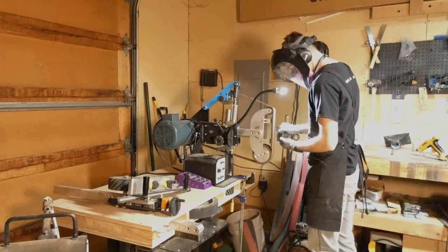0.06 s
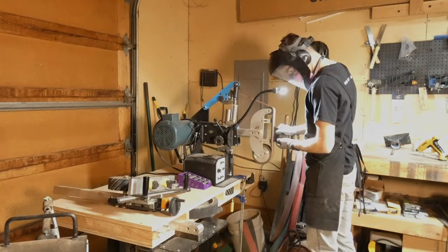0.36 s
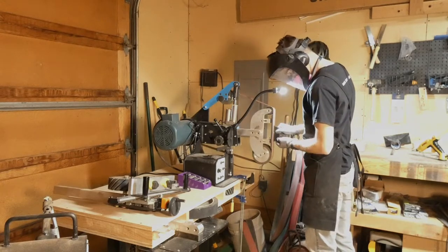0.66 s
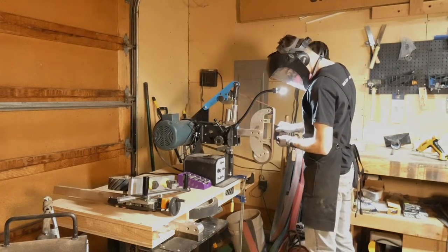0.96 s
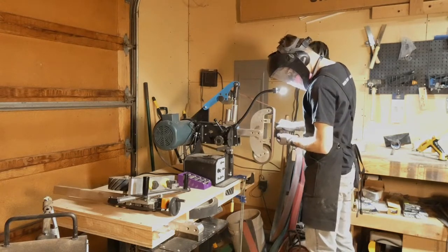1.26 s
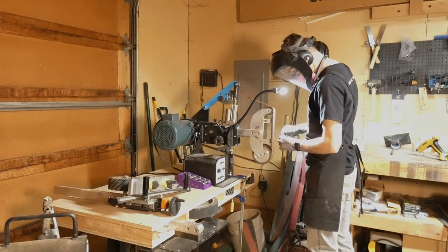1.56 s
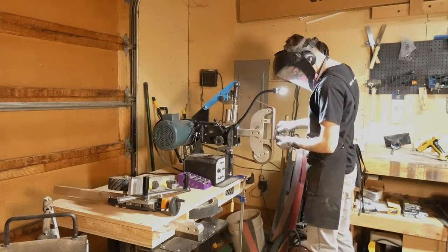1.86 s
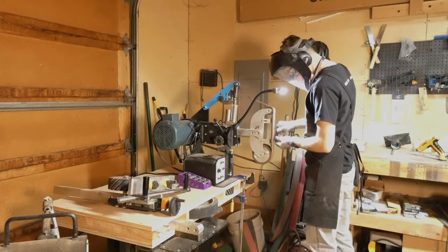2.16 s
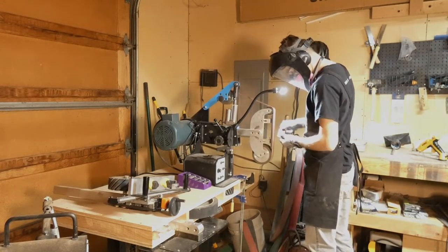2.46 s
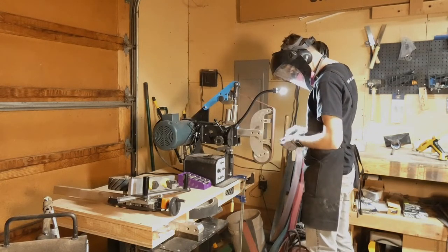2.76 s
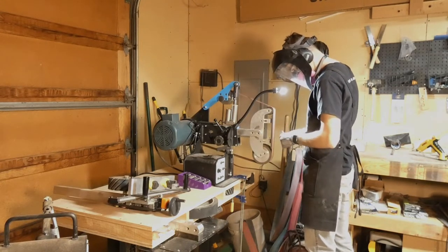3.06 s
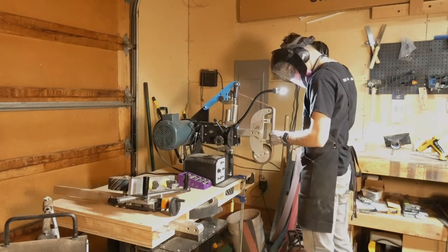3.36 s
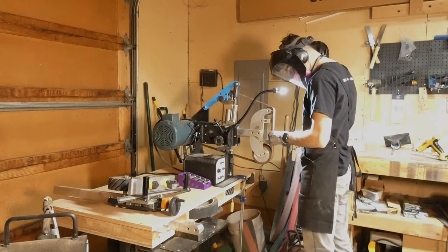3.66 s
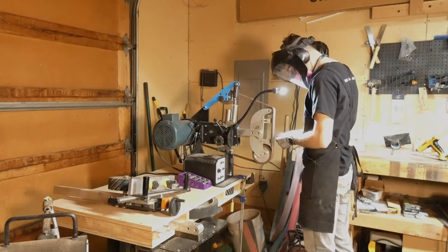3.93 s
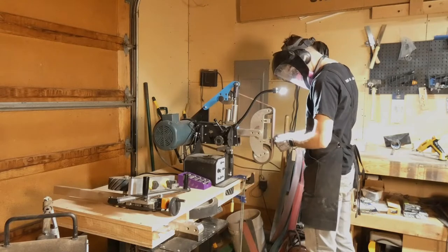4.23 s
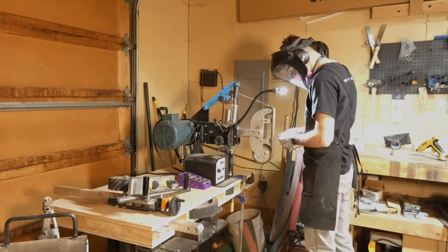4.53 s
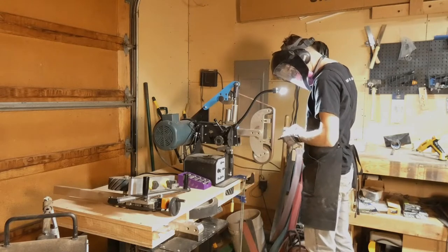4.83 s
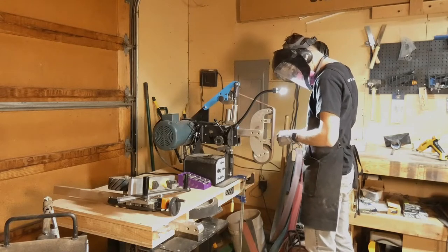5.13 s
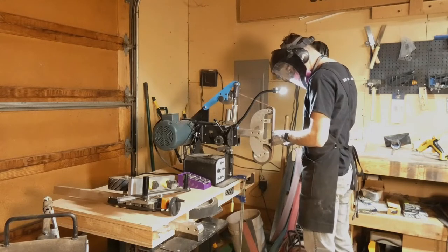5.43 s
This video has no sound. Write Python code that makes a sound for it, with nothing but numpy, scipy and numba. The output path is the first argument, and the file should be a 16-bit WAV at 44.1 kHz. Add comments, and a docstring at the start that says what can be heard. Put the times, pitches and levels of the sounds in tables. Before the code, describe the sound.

Steel is ground on a running belt grinder in one long pass and four short ones, with bright hiss over a whirring hum.

```python
"""A belt grinder in a small workshop. It opens on a tenth of a second of steel leaned hard into a belt,
roaring; then the scene changes and the level dips briefly as the new one fades in. There the machine runs: the
belt's grit pattern comes round once a lap and the drive wheel hums on its shaft orders. Scrap steel is then
touched to the belt in one longer pass and four short ones; each rasps on an edge, then hisses, rings and
chatters. The camera's gain control ducks the machine under each pass and lets it swell back afterwards."""
import sys
import numpy as np
from scipy import signal
from scipy.fft import rfft, irfft, next_fast_len
from scipy.io import wavfile
from scipy.ndimage import uniform_filter1d, map_coordinates
from numba import njit

SR = 44100
rng = np.random.default_rng(int(sys.argv[2]) if len(sys.argv) > 2 else 0)


def to_wav(s):
    """Save 16-bit WAV."""
    ch = np.atleast_2d(s).T  # columns
    pcm = np.round(np.clip(ch, -1, 1) * 32767)  # PCM
    wavfile.write(sys.argv[1], SR, pcm.astype(np.int16))


N = 250929

LAP_HZ, SHAFT_HZ = 21.12, 48.83  # belt laps and wheel turns a second, running free
BREAK_S, TOP_HZ = .1045, 15750  # end of the roar; top of the band


# Touches of the steel: start t/s, length t/s, landing t/s, hiss level/dB, bite level/dB,
# closing push level/dB, tilt/(dB per octave), ring-to-hiss level/dB, rasp level/dB, rasp fade t/s
PASSES = [ (0.352, 0.93, 0.021, -36.5, 9, 2.5, 0, -5, -28.5, 0.034),
          (1.923, 0.475, 0.05, -22.5, 1, 1.5, 4, -8.5, -31, .14),
          (3.325, 0.42, 0.068, -24.5, 0, 1.5, 4.5, -6.5, -32, .11),
          (4.105, .32, 0.06, -23.5, 1, 4, 6.5, -10, -31.5, 0.072),
          (5.325, 0.47, 0.053, -25.5, -2.5, -2.5, 4, -7, -33, 0.065)]

def pass_pressures():
    """Strength of the cut in each pass: the steel bites, settles and is pushed off."""
    return [amp(db) * stroke(start, length, landing, lift_s=0.01866)
            * lean(start, length, landing, bite_db, push_db, settle_s=0.175)
            for start, length, landing, db, bite_db, push_db, *_ in PASSES]


# Bright hiss EQ, before each pass's tilt: f/Hz, level/dB
HISS_EQ = [(1470, -44), (2500, -14.5), (3500, -6), (4500, 0), (5500, 2.5), (6820, 3), (9780, -1),
           (11800, 1), (15600, -4)]
# Ring of the steel, one set per grip: f/Hz, width/Hz before width_scale, level/dB
GRIP_MODES = [
    [(6780, 33, 5), (7900, 130, 1), (10350, 90, -1), (11800, 45, 4), (12200, 70, 0)],
    [(6250, 200, -5), (7140, 90, 0), (7680, 50, 7), (8300, 250, -2), (10200, 53, 1), (12100, 78, 1),
     (13800, 30, -1), (15300, 100, -9)],
    [(6200, 70, -7), (6860, 68, 1), (10900, 50, -2), (11270, 130, 4), (12000, 40, 2), (12600, 60, 0),
     (15100, 200, -4)],
    [(8200, 110, -2), (9100, 46, -11), (9700, 67, -3.5), (10780, 120, 3), (11800, 80, -1), (12100, 68, 8),
     (14600, 42, -2)],
    [(7700, 40, -6), (9100, 140, -4.5), (10300, 40, 1.5), (11000, 59.6, 5), (11500, 50, 6), (12200, 57, 6),
     (14200, 40, 3)],
]

def cutting(run, pressures):
    """Grit tears chips from the steel: a rasp gives way to a bright hiss that also rings the piece."""
    out = edge_rasp(run)
    for pressure, modes, (*_, tilt_db, ring_db, _, _) in zip(pressures, GRIP_MODES, PASSES):
        bite = grit(run, LAP_HZ, repeat=0.17)
        hiss = stereo(bite, lambda hz: amp(along(HISS_EQ, hz) + tilt_db * np.log2((hz + 1) / TOP_HZ)))
        ring = stereo(noise(), lambda hz: resonances(modes, hz, width_scale=0.82))
        out += pressure * unit(hiss + amp(ring_db) * ring)
    return out * amp(0.18 * wobble(24.8) + 0.96 * wobble(170))  # the hand-held piece trembles


# Coarse attack EQ: f/Hz, level/dB
RASP_EQ = [(1500, -43), (3000, -15), (4300, -5), (5100, 1), (6300, -4.5), (7900, -4), (10000, -5),
           (15500, -18)]

def edge_rasp(run, peak_s=0.032, rise_s=0.036):
    """Grit tips catch the edge before it lands; the rasp fades as the face beds in."""
    envelope = np.zeros(N)
    for start, *_, rasp_db, fade_s in PASSES:
        past_peak = np.arange(N) / SR - start - peak_s
        envelope += amp(rasp_db) * np.exp(np.minimum(past_peak / rise_s, -past_peak / fade_s))
    return envelope * stereo(grit(run, LAP_HZ, repeat=0.12), eq(RASP_EQ))


# Body of the roar: f/Hz, level/dB
ROAR_EQ = [(76, -66), (130, -40), (165, -22), (240, 0.5), (313, -10.5), (619, -3.5), (756, -20), (923, -10),
           (1350, -4.5), (1650, -6), (2200, -8.5), (5060, -5), (7200, -9.5), (8300, -12.5), (9800, -11),
           (12000, -18), (15500, -43)]
# Ring on top of it: f/Hz, width/Hz, level/dB
ROAR_RING = [(820, 28, 9), (1350, 68, -4), (3170, 120, 2), (3500, 60, -3), (4780, 590, 0), (5040, 260, 5),
             (6000, 320, -3)]

def hard_pass():
    """Steel leaned hard into the belt roars through the whole machine."""
    body = stereo(noise(), eq(ROAR_EQ))
    ring = stereo(noise(), lambda hz: resonances(ROAR_RING, hz))
    return (amp(-21) * body + amp(-30.5) * ring) * amp(0.3 * wobble(194))


# Bouts of judder: start t/s, length t/s, landing t/s, ring level/dB, scrape level/dB, bite level/dB
BOUTS = [ (.448, 0.274, 0.067, -39, -42, -0.5), (.61, .12, 0.025, -40.5, -56, 6),
         (.74, 0.397, 0.063, -38.5, -41, 1), (1.12, 0.116, 0.051, -34.5, -44.5, 1),
         (2.29, 0.08, 0.061, -42.5, -41, 0.5), (3.419, 0.22, .03, -47.5, -52.5, 5.5),
         (4.23, 0.18, .05, -46.5, -53, -1), (5.385, 0.52, 0.044, -39.5, -49.5, -2.5)]

def bout_strengths():
    """Strength of the ring and of the scrape in each bout; one stroke carries both."""
    bouts = []
    for start, length, landing, ring_db, scrape_db, bite_db in BOUTS:
        force = lean(start, length, landing, bite_db, push_db=0, settle_s=0.18)
        envelope = force * stroke(start, length, landing, lift_s=0.0207)
        bouts.append((amp(ring_db) * envelope, amp(scrape_db) * envelope))
    return bouts


# Judder resonances, one set per bout as the piece is rocked: f/Hz, width/Hz, level/dB
JUDDER_MODES = [
    [(690, 120, 1), (1030, 270, -3), (1380, 180, -6), (1880, 63, -6), (2245, 30, 9.5)],
    [(660, 100, -9.5), (1060, 80, -9), (1410, 22, 11), (1920, 36, 1)],
    [(1070, 64, -7), (1960, 49, 1), (2286, 37, -0.5), (2560, 300, -5)],
    [(1380, 70, -3), (1830, 400, -0.5), (2520, 150, 3.5)],
    [(1390, 150, 0), (2000, 200, -0.82)],
    [(720, 55, 4), (840, 120, -2), (1140, 180, -8.5), (2160, 180, -8)],
    [(806, 170, -1), (1090, 210, 1), (2280, 100, -1)],
    [(743, 120, 0), (1340, 160, -1), (2160, 190, 3)],
]
# Midrange scrape EQ: f/Hz, level/dB
SCRAPE_EQ = [(150, -55), (350, -28), (600, 8.5), (1000, 14.5), (1700, 15), (2600, 12.5), (3300, -0.5),
             (6000, -16)]

def chatter(run, bouts):
    """Pressed flat, the steel scrapes and judders against the platen, a touch harder once a lap."""
    out = np.zeros((2, N))
    for (ring, _), modes in zip(bouts, JUDDER_MODES):
        rub = grit(run, LAP_HZ, repeat=.2)
        out += ring * stereo(rub, lambda hz: resonances(modes, hz) * low_cut(hz, 500, order=3))
    scrape = stereo(grit(run, LAP_HZ, repeat=0.22), eq(SCRAPE_EQ))
    out += sum(strength for _, strength in bouts) * scrape
    lap_swell_db = 0.3 * np.cos(2 * np.pi * LAP_HZ * run)
    return out * amp(lap_swell_db + 0.8 * wobble(30) + 1.1 * wobble(220))


# Flutter from the uneven coating: waves per lap, depth
COATING_RIPPLE = [(12, 0.071), (13, 0.039), (27, 0.09)]
# Airy swish EQ: f/Hz, level/dB
SWISH_EQ = [(100, -55), (410, -45), (700, -2), (980, -23.5), (1050, -5), (1100, -11), (1150, -7),
            (1240, -10), (1290, -9.5), (1670, -9), (2050, -8.5), (2450, -8.5), (3110, -7), (3820, -6),
            (4410, -9), (6200, -6), (7000, -5.5), (9000, -2.5), (10300, -3.5), (11200, -4), (11900, -4),
            (15500, -7.5)]
# Strongest tones of the grit pattern: f/Hz before snapping to a lap harmonic, relative level/dB
GRIT_WHISTLES = [(6228, -58), (6842, -60), (7564, -57), (7687, -58), (7817, -56), (8070, -59),
                 (8786, -54.5), (8893, -56), (9039, -57), (9146, -54), (9550, -57), (9631, -57),
                 (9717, -54), (9905, -55.5), (10137, -56), (10180, -55), (10223, -52), (10287, -56),
                 (10390, -53.5), (10627, -58), (10837, -56), (11386, -57), (11827, -51), (12231, -57),
                 (12780, -56), (13770, -60)]

def belt(run, load):
    """The belt swishes and whistles over its wheels, lap after lap; pressure softens the swish."""
    laps = LAP_HZ * run
    coating = 1 + sum(depth * np.cos(2 * np.pi * (round(waves) * laps + rng.random()))
                      for waves, depth in COATING_RIPPLE)
    swish = stereo(grit(run, LAP_HZ, repeat=.64) * coating, eq(SWISH_EQ))
    whistles = sum(amp(db) * tone(round(hz / LAP_HZ) * laps, waver_db=5, spread=0.14)
                   for hz, db in GRIT_WHISTLES)
    return amp(-29.5 - 0.73 * load + 0.19 * wobble(9.5)) * swish + amp(-0.5) * whistles


# Partials of the hum: shaft order, relative level/dB
HUM_PARTIALS = [(5, -74.5), (7, -66.5), (10, -48.5), (17, -55.5), (22, -47.5), (25, -51.5), (35, -52.5),
                (40, -54), (44, -56.5), (66, -51.5), (74, -59), (76, -53.5), (80, -53)]

def drive_wheel(run, load, damping_db=9, knee_order=23.6):
    """The wheel hums on its shaft orders and whirs once a turn; load damps the low orders most."""
    hum = np.zeros((2, N))
    for order, db in HUM_PARTIALS:
        loss_db = damping_db * load / np.hypot(1, (order / knee_order) ** 4)
        hum += amp(db - loss_db) * tone(order * SHAFT_HZ * run, waver_db=1, spread=0.21)
    whir = stereo(grit(run, SHAFT_HZ, repeat=0.28), lambda hz: resonances([(3230, 4300, 0)], hz) ** 2)
    return amp(0.46) * hum + amp(-40 - 2.1 * load) * whir


# Boxy mids of the frame: f/Hz, level/dB
FRAME_EQ = [(25, -70), (180, -19.5), (270, -16.5), (350, 3.5), (420, -3), (530, 9), (700, -7.5), (860, 9.5),
            (1100, 4), (1500, -5.5), (3000, -65)]
# Low end of the stand: f/Hz, level/dB
RUMBLE_EQ = [(25, -17), (60, -12.5), (120, -7), (190, -7.5), (250, 0.5), (300, 2), (420, -25), (900, -70)]

def frame_and_stand(run, load):
    """The drive shakes the frame and sets the stand rumbling unevenly; load damps both."""
    frame = stereo(grit(run, LAP_HZ, repeat=0.34), eq(FRAME_EQ))
    rumble = stereo(noise(), eq(RUMBLE_EQ))
    return amp(-46.5 - 2.2 * load) * frame + amp(-69 - 2.5 * load + 4 * wobble(18)) * rumble


# Faint low notes: start t/s, length t/s, f/Hz, level/dB
DRONE_NOTES = [ (.105, 0.55, 364, -60.5), (.87, 0.47, 244, -68)]

def drones(run):
    """Low drones come and go while the piece settles; their pitch follows the motor."""
    return sum(amp(db) * stroke(start, length, landing_s=0.035, lift_s=0.023)
               * tone(hz * run, waver_db=2.5, spread=0.18) for start, length, hz, db in DRONE_NOTES)


def motor(contact, slip, half_load_db):
    """Load slows the motor a little; gives run (seconds' worth of full speed so far) and load (0-1)."""
    load = uniform_filter1d(contact ** 2 / (contact ** 2 + amp(half_load_db) ** 2), size=3000)
    return np.cumsum(1 - slip * load) / SR, load


def workshop(x, wet_db, t60):
    """The small room answers with a short diffuse tail."""
    t = np.arange(SR // 3) / SR
    tail = rng.standard_normal(len(t)) * amp(-60 * t / t60) * (t > .004)
    wet = signal.fftconvolve(x, tail[None] / np.linalg.norm(tail), axes=1)[:, :N]
    return (x + amp(wet_db) * wet) / np.hypot(1, amp(wet_db))


# Stereo image: f/Hz, left-right likeness (1 is mono)
LIKENESS = [(30, .95), (60, 0.75), (120, 0.88), (240, 0.9), (480, 0.97), (950, 0.58), (1890, 0.43),
            (3770, 0.49), (7520, 0.68), (15000, 0.8)]

def stereo(pair, colour, ripple_db=6):
    """Colour two unrelated signals, ripple them with room modes and blend to left and right at rms 1."""
    def response(hz):
        angle = np.arccos(np.clip(along(LIKENESS, hz), -1, 1)) / 2
        knots = np.arange(0, SR / 2, 25)
        ripple = np.interp(hz, knots, 2 * rng.random(len(knots)) - 1)
        modes_db = ripple_db * ripple * hz / (hz + 1200)
        return colour(hz) * amp(modes_db) * np.array([np.cos(angle), np.sin(angle)])
    mid, side = filtered(pair, response)
    return unit(np.array([mid + side, mid - side]))


def grit(run, turn_hz, repeat):
    """Contact noise of a rough loop: the share 'repeat' comes back the same on every turn."""
    size = int(SR / turn_hz)
    spectrum = np.exp(2j * np.pi * rng.random((2, size // 2)))
    loop = unit(irfft(spectrum, size * 8))
    place = np.linspace(0, 1, loop.shape[1], endpoint=False)
    pattern = np.array([np.interp((turn_hz * run) % 1, place, side) for side in loop])
    return np.sqrt(repeat) * pattern + np.sqrt(1 - repeat) * noise()


def tone(cycles, waver_db, spread):
    """A wavering sine; reflections shift its phase between left and right."""
    phase = 2 * np.pi * (cycles + rng.random()) + spread * rng.choice([-1, 1]) * np.array([[1], [-1]])
    return np.sqrt(2) * amp(waver_db * wobble(9)) * np.sin(phase)


def stroke(start, length, landing_s, lift_s):
    """Envelope of one contact: it lands, holds and dies away."""
    age = np.arange(N) / SR - start
    return np.clip(age / landing_s, 0, 1) * np.exp(-np.maximum(age - length, 0) / lift_s)


def lean(start, length, landing_s, bite_db, push_db, settle_s, push_s=0.0087):
    """Accents of the hand's force: a first bite that eases off, and a push just before leaving."""
    age = np.arange(N) / SR - start
    bite = np.exp(-np.maximum(age - landing_s, 0) / settle_s)
    push = np.exp(-np.maximum(length - age, 0) / push_s)
    return amp(bite_db * bite + push_db * push)


def resonances(modes, hz, width_scale=1):
    """Magnitude response of (f/Hz, width/Hz, level/dB) modes, summed in power."""
    power = 0
    for centre, width, db in modes:
        damping = hz * width * width_scale
        power += np.abs(amp(db) * damping / (centre ** 2 - hz ** 2 + 1j * damping)) ** 2
    return np.sqrt(power)


def noise():
    """Two unrelated white noises."""
    return rng.standard_normal((2, N))


def wobble(rate):
    """A smooth random curve, rate knots a second."""
    return map_coordinates(rng.standard_normal(int(N * rate / SR) + 4), [np.arange(N) * rate / SR])


def filtered(x, response):
    """Shape x by a gain that depends on frequency."""
    size = next_fast_len(N + SR // 4)
    return irfft(rfft(x, size) * response(np.fft.rfftfreq(size, 1 / SR)), size)[..., :N]


def low_cut(hz, corner_hz, order):
    """Gain of a high-pass filter."""
    return 1 / np.hypot(1, (corner_hz / (hz + 1)) ** order)


def eq(points):
    """Gain curve through (f/Hz, level/dB) points."""
    return lambda hz: amp(along(points, hz))


def along(points, hz):
    """Interpolate (f/Hz, value) points on a log axis."""
    freqs, values = np.transpose(points)
    return np.interp(np.log(hz + 1), np.log(freqs + 1), values)


def amp(db):
    """Decibels to gain."""
    return 10 ** (np.asarray(db) / 20)


def unit(x):
    """Scale to rms 1."""
    return x / np.sqrt(np.mean(x ** 2) + 1e-20)


def scene():
    """A tenth of a second of hard grinding, then the scene changes: the level dips briefly and the lighter work
    goes on."""
    t = np.arange(N) / SR
    pressures, bouts = pass_pressures(), bout_strengths()
    contact = sum(pressures) + amp(6) * np.sum(bouts, axis=(0, 1))
    run, load = motor(contact, slip=.007, half_load_db=-33)
    machine = belt(run, load) + drive_wheel(run, load) + frame_and_stand(run, load) + drones(run)
    steel = cutting(run, pressures) + chatter(run, bouts)
    work = machine + workshop(steel, wet_db=-8, t60=.3)
    dip = amp(-18 * np.exp(-np.maximum(t - BREAK_S, 0) / 0.0041))
    roaring = np.clip((BREAK_S - t) / .002, 0, 1)
    mix = roaring * hard_pass() + (1 - roaring) * dip * work
    return mix * amp([[.2], [-.2]])  # a hair to the left


@njit
def follow(level, attack_s, release_s):
    """An envelope that rises fast and sinks slowly."""
    out, state = np.empty_like(level), 1.0
    for i in range(len(level)):
        state += (level[i] - state) / (SR * (attack_s if level[i] > state else release_s))
        out[i] = state
    return out


def gain_control(x, threshold_db, sense_hz, fast_slope, slow_slope):
    """Duck everything when the treble passes a threshold; a slow stage remembers earlier passes."""
    treble = filtered(x.mean(0), lambda hz: low_cut(hz, sense_hz, order=4))
    level = np.sqrt(np.abs(uniform_filter1d(treble ** 2, size=300))) / amp(threshold_db)
    fast = follow(level, attack_s=0.012, release_s=0.24)
    slow = follow(level, attack_s=3.8, release_s=11.0)
    return x * np.maximum(fast, 1) ** -fast_slope * np.maximum(slow, 1) ** -slow_slope


def record(dry):
    """The camera's gain control and band limit."""
    ducked = gain_control(dry, threshold_db=-32, sense_hz=8700, fast_slope=0.79, slow_slope=.35)
    return filtered(ducked, lambda hz: hz < TOP_HZ)


dry = scene()
out = record(dry)
to_wav(out)
```